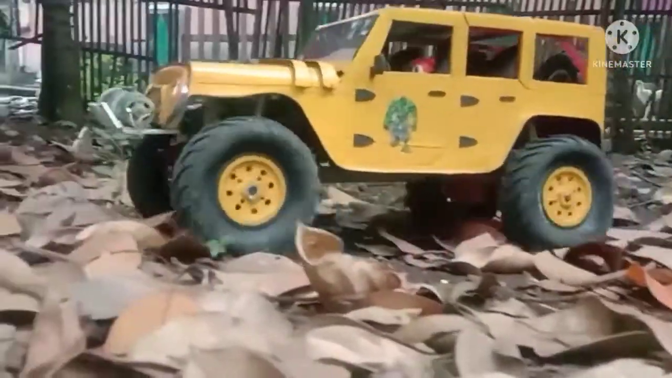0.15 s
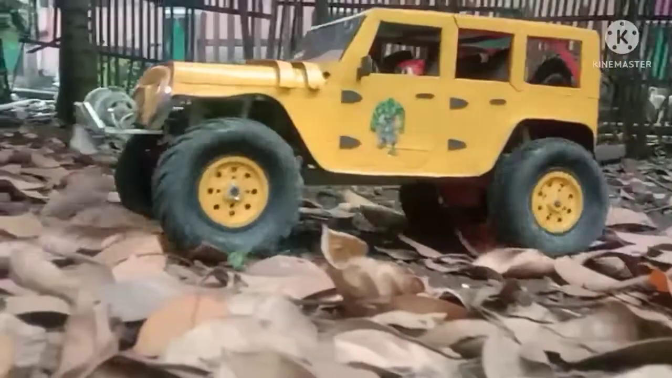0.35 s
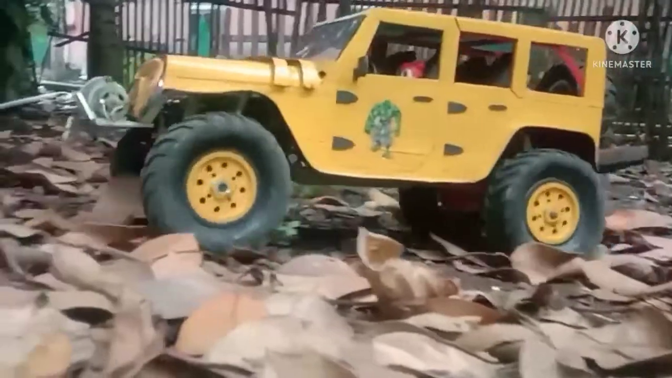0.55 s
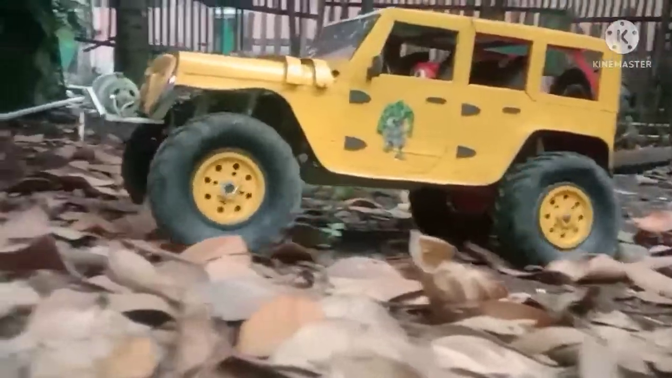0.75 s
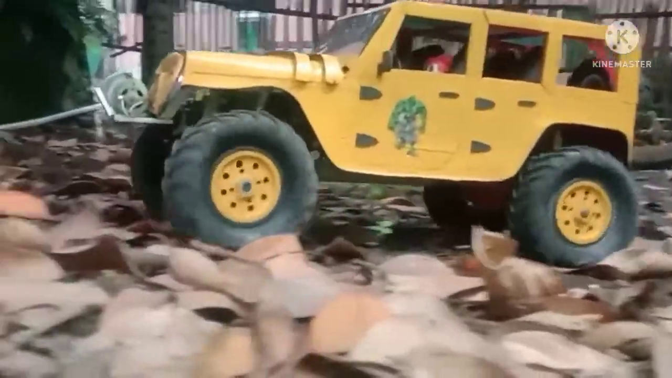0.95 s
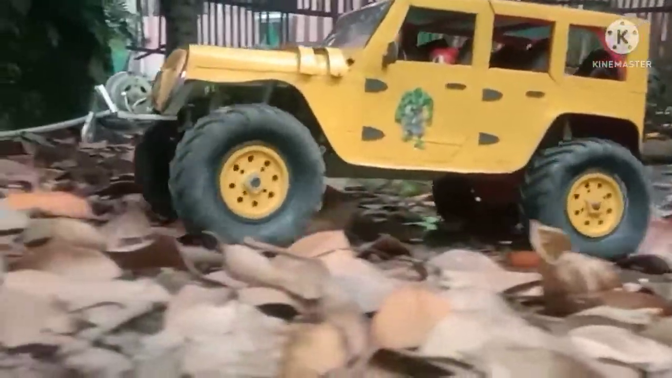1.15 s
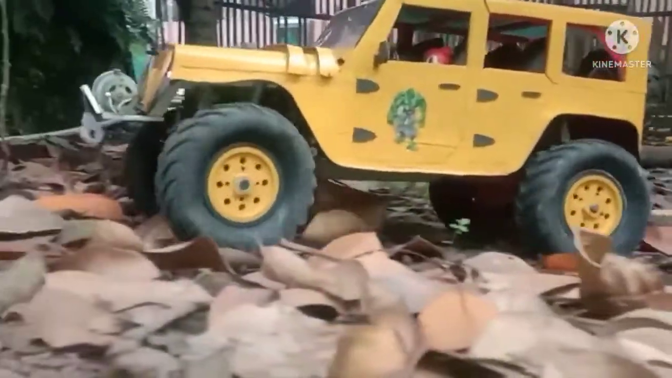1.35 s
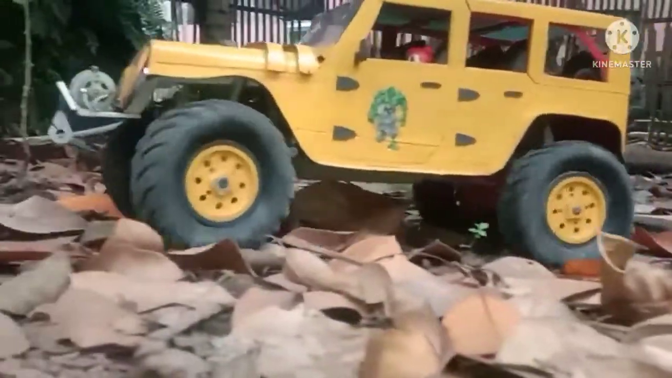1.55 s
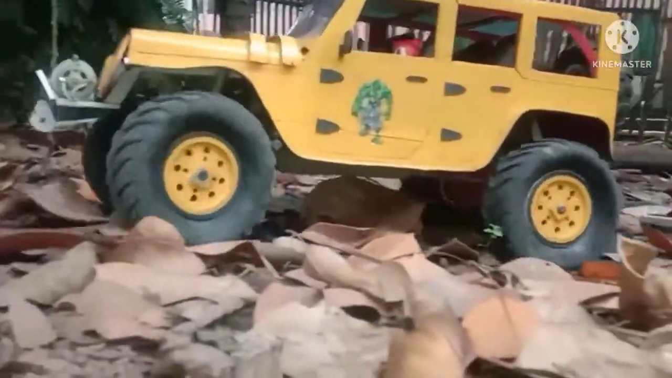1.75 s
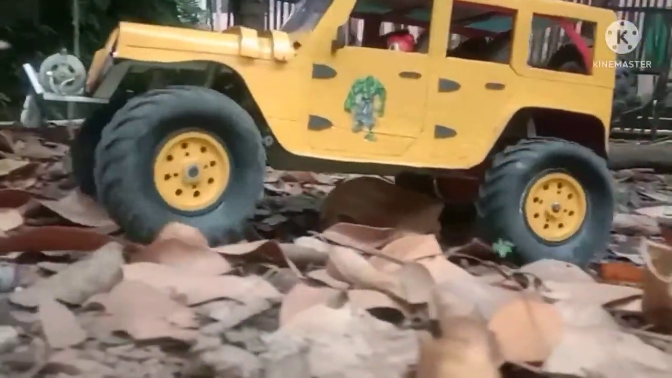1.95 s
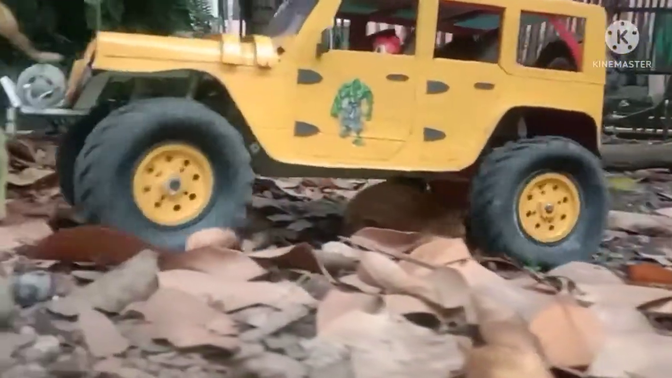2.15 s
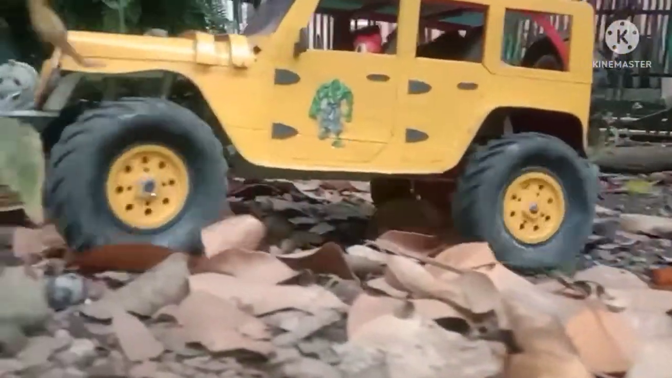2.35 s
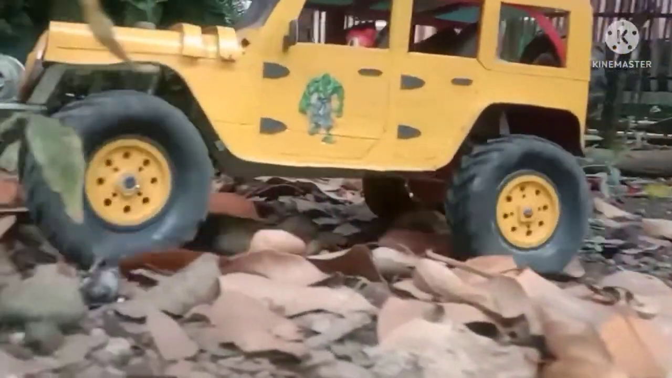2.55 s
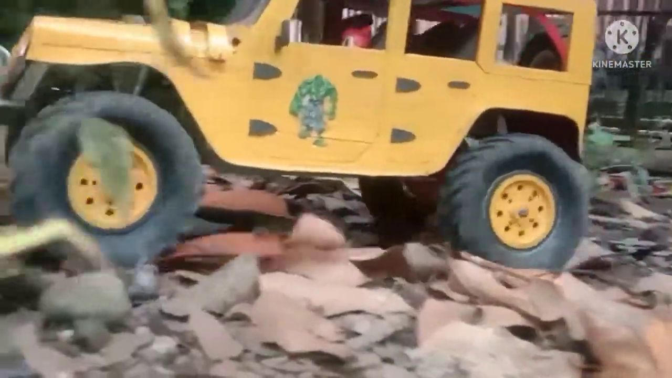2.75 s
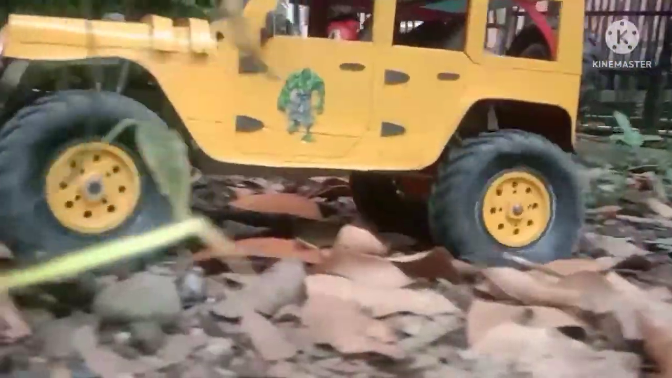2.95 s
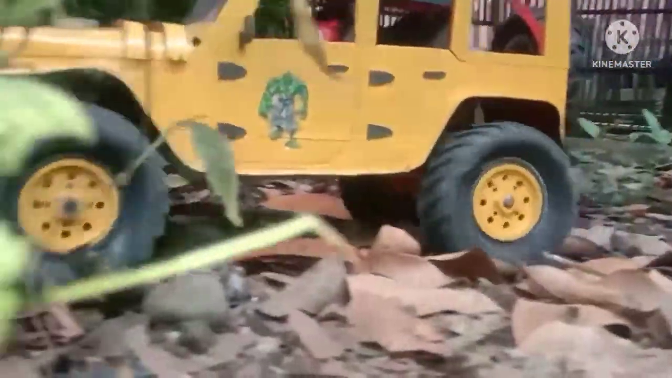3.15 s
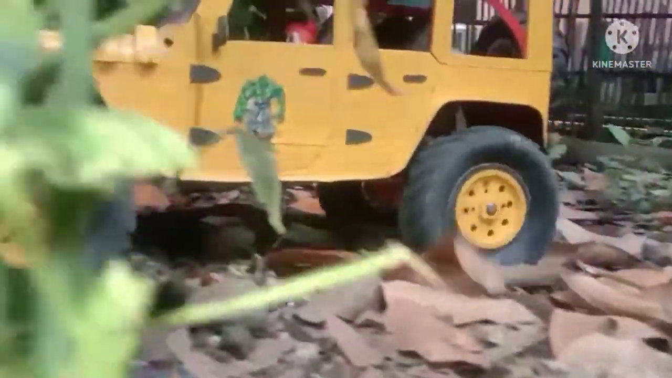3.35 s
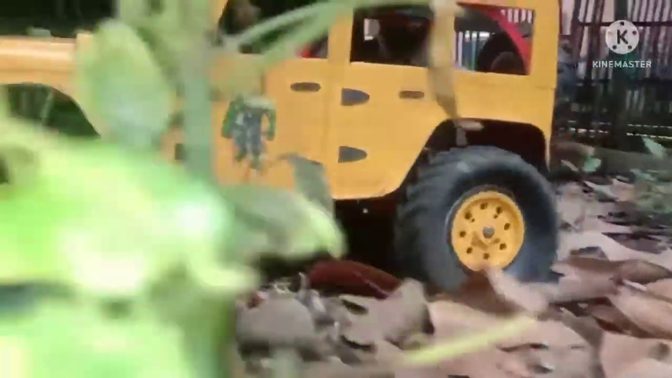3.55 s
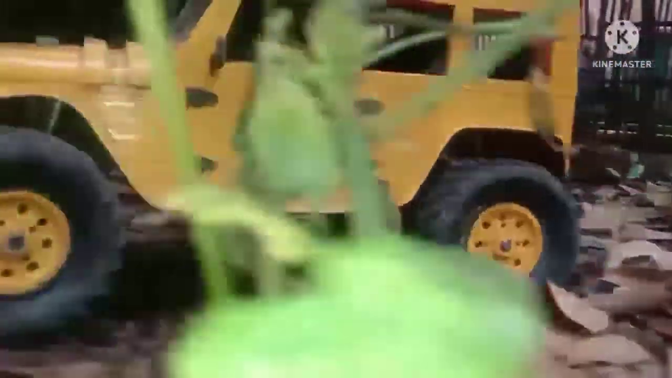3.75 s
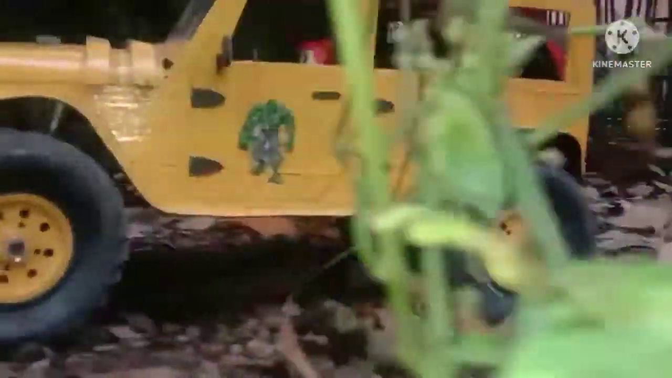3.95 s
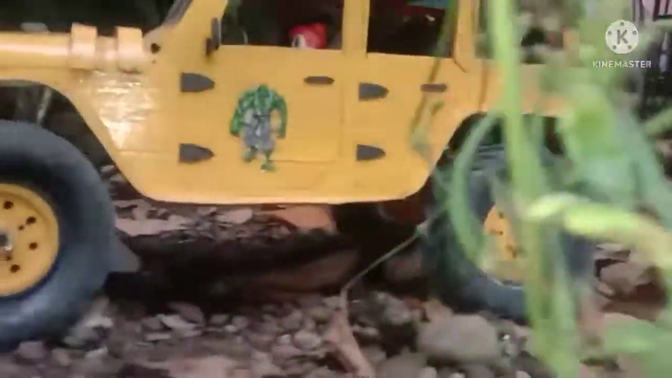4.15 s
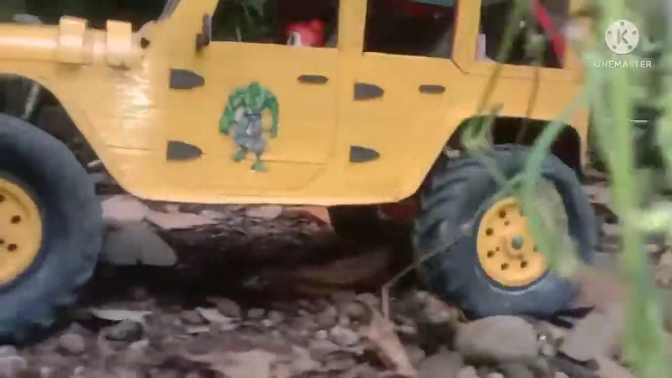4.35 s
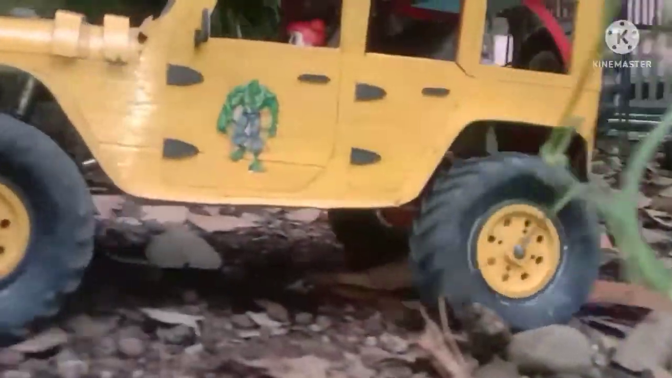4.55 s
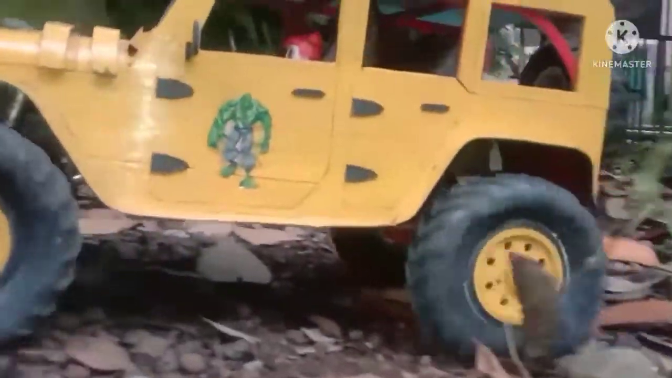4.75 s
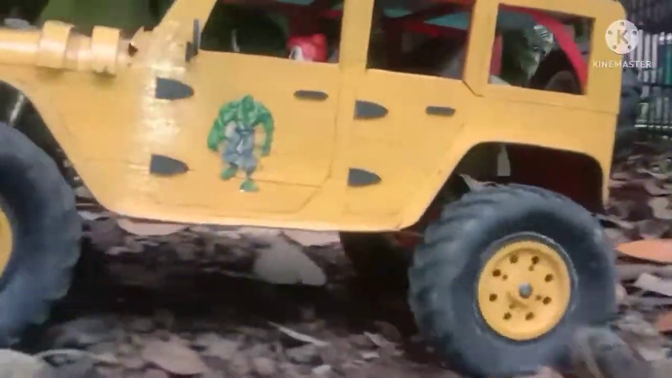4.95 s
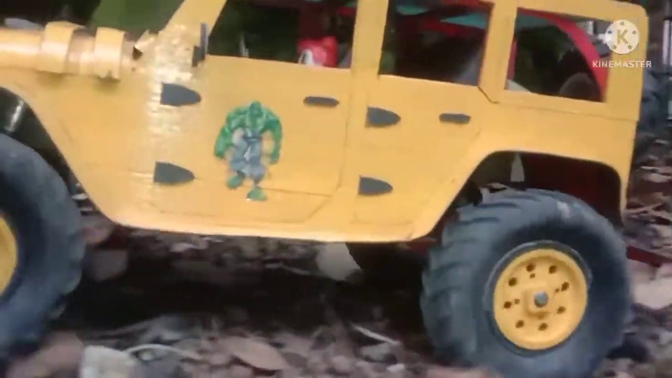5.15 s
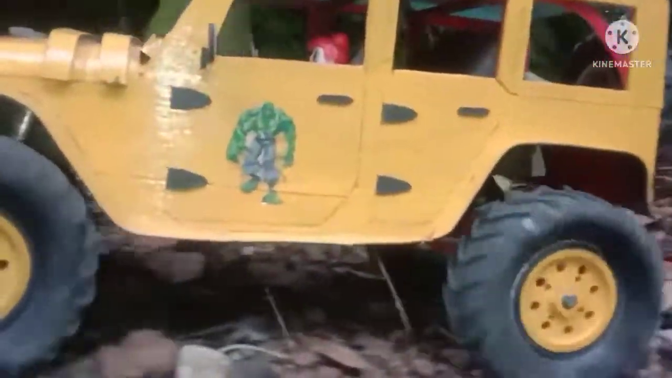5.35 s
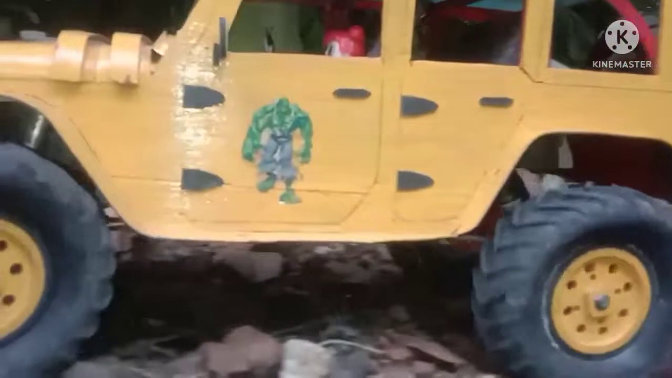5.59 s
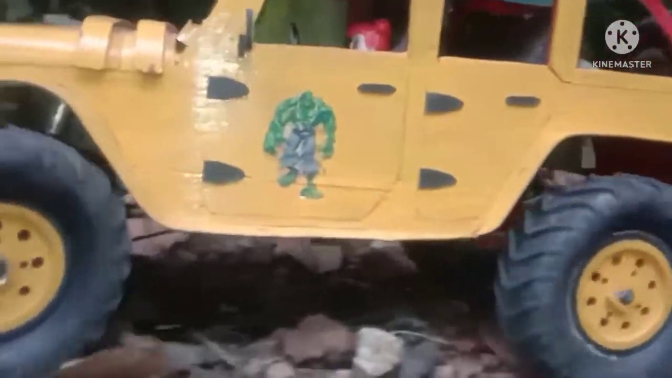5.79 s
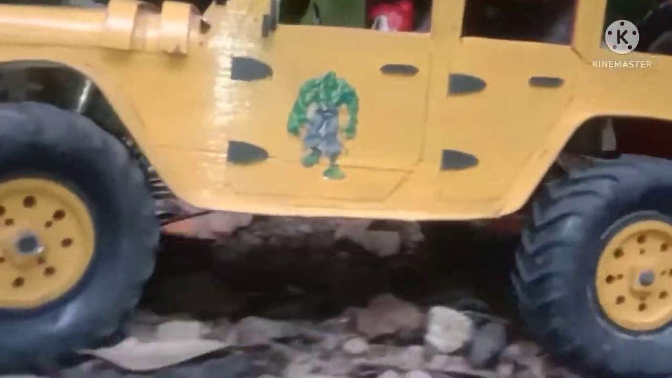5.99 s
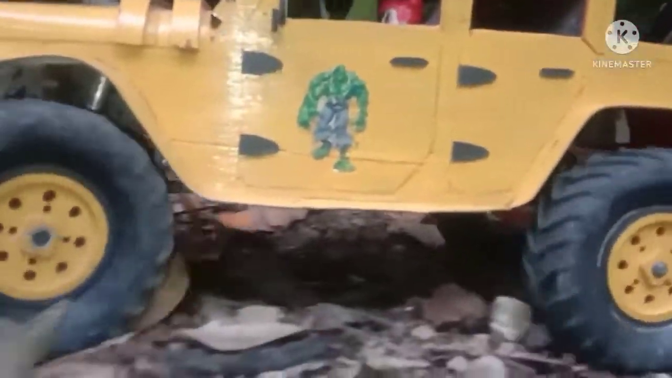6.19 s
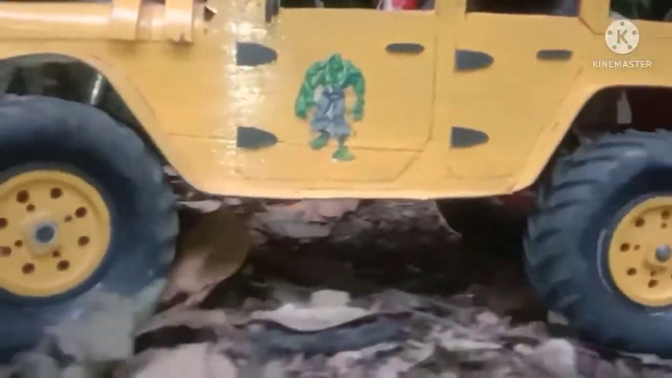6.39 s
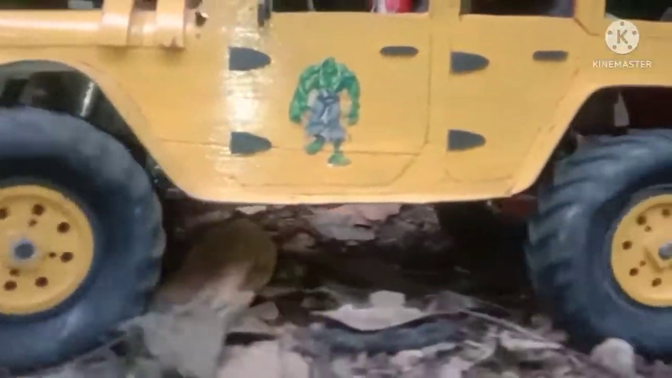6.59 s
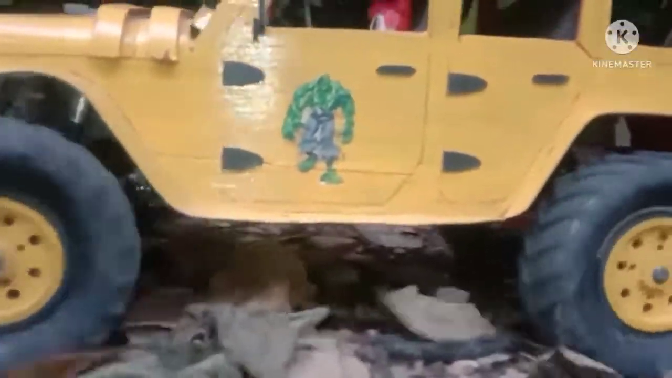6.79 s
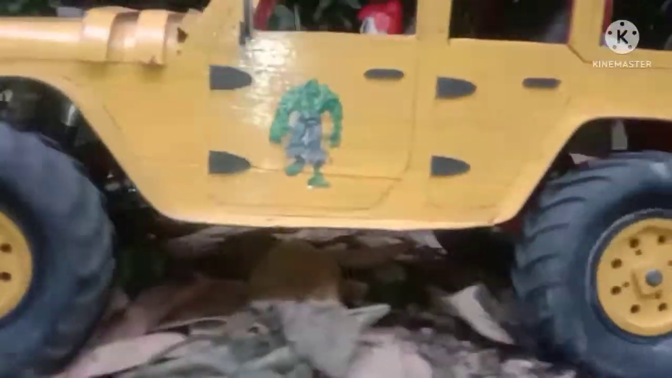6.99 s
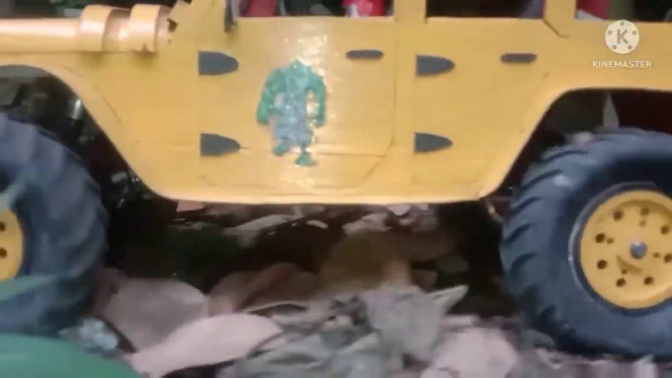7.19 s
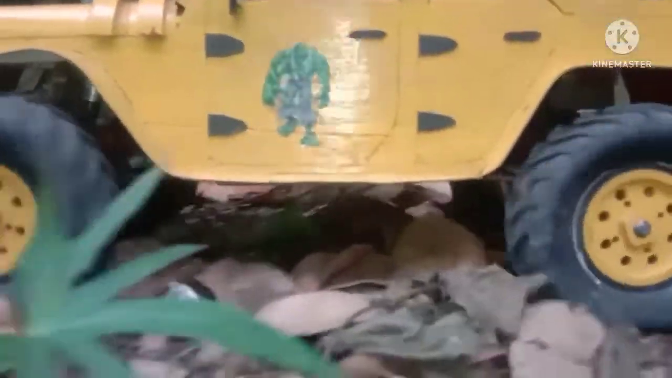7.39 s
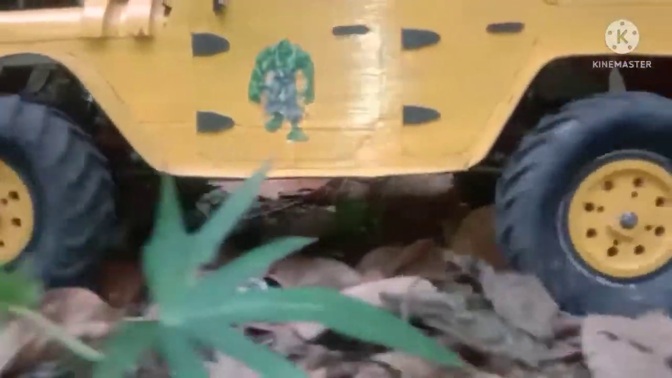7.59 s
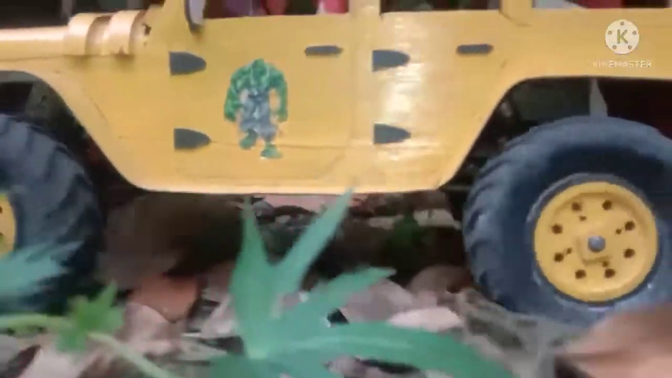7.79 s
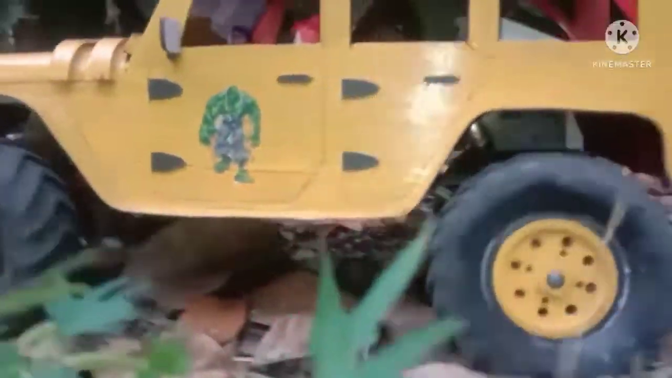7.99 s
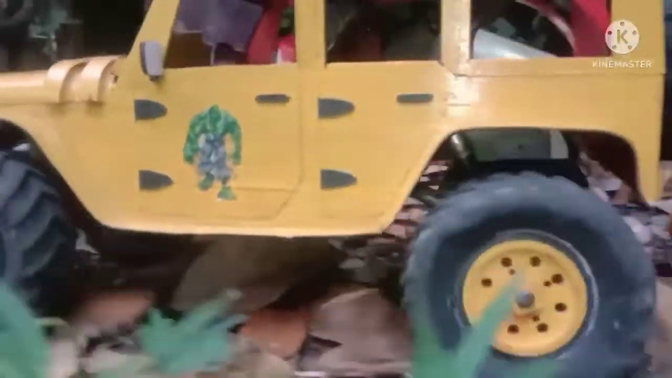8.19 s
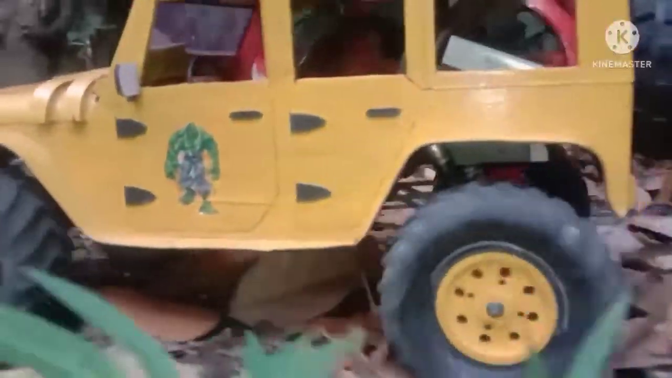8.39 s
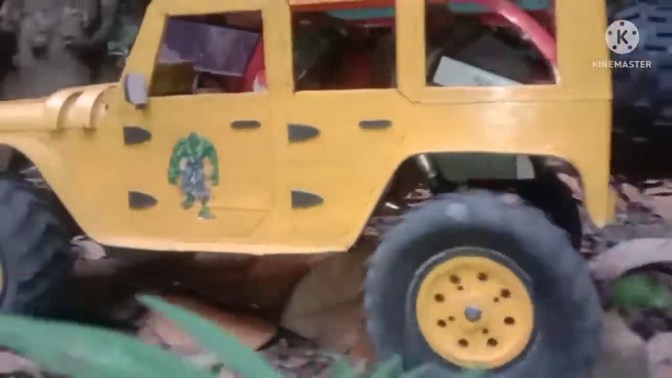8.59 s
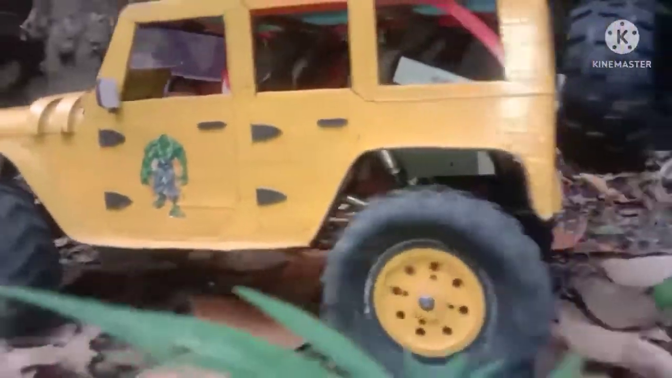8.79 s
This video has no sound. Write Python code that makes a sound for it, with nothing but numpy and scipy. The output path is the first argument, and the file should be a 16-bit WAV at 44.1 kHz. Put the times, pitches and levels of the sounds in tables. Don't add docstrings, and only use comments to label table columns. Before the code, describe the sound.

A toy crawler truck creeps past very close to the ground. A continuous bright gear chatter and wavering whine dominate, dipping briefly at each obstacle and recovering. Tyres press faintly through leaves, then grittier dirt after about two seconds. The truck swells closer by four seconds; a cluster of twigs snaps just before six. Far low rumble sits underneath, outdoors and dry.

```python
import sys
import numpy as np
from scipy import signal
from scipy.fft import rfft, irfft
from scipy.io import wavfile
from scipy.ndimage import uniform_filter1d

SR = 44100
rng = np.random.default_rng(int(sys.argv[2]) if len(sys.argv) > 2 else 0)


def attenuation_scalar(level_db):
    decades = np.asarray(level_db, float) / 20
    return 10 ** decades


def persist_wave(psi):
    counts = np.round(np.clip(psi, -1, 1) * 32767).astype(np.int16)
    wavfile.write(sys.argv[1], SR, np.atleast_2d(counts).T)


N = 389403
TIME = np.arange(N) / SR
TEETH = 30


def curves(table):
    s, *columns = np.transpose(table)
    return [np.interp(TIME, s, column) for column in columns]


def bumps(events):
    return sum(size * np.exp(-((TIME - s) / half) ** 2 / 2) for s, size, half in events)


def colour(hz, table):
    at, db = np.transpose(table)
    return np.interp(np.log(hz + 1), np.log(at), db)


def unit(x):
    return x / np.sqrt(np.mean(np.abs(x) ** 2))


def walk(rate):
    hold = int(SR / rate)
    steps = np.repeat(rng.standard_normal(9000), hold)[:N]
    return unit(uniform_filter1d(uniform_filter1d(steps, hold), hold))


def shaped(x, table):
    hz = np.fft.rfftfreq(N, 1 / SR)
    return unit(irfft(rfft(x) * attenuation_scalar(colour(hz, table)), N))


def body(x, broad, rings, parts_db, edges_hz, loud_hz, patchy_db):
    f, t, z = signal.stft(unit(x), SR, nperseg=2048, noverlap=1792)
    peaks = sum(attenuation_scalar(2 * db) / (1 + (2 * (f - centre) / width) ** 2) for centre, width, db in rings)
    power = attenuation_scalar(2 * colour(f, broad)) * (1 + peaks)
    above = [1 / (1 + np.exp(np.clip((edge - f) / 50, -50, 50))) for edge in edges_hz]
    share = -np.diff([1 + 0 * f, *above, 0 * f], axis=0)
    frames = np.clip((t * SR).astype(int), 0, N - 1)
    patches = rng.standard_normal(z.shape)
    for _ in range(2):
        patches = uniform_filter1d(uniform_filter1d(patches, size=4, axis=0), size=30, axis=1)
    gain_db = share.T @ np.array(parts_db)[:, frames] + patchy_db * unit(patches)
    band = np.mean(power * (f > loud_hz[0]) * (f < loud_hz[1]))
    z = z * np.sqrt(power / band)[:, None] * attenuation_scalar(gain_db)
    return signal.istft(z, SR, nperseg=2048, noverlap=1792)[1][:N]


def cracks(events, ring_s, spread):
    out = np.zeros(N)
    t = np.arange(int(.05 * SR)) / SR
    for s, db, hz in events:
        burst = rng.standard_normal(len(t)) * np.minimum(t / 0.00066, 1) * np.exp(-t / ring_s)
        edges = [hz / spread, min(hz * spread, .45 * SR)]
        burst = signal.sosfilt(signal.butter(2, edges, "bandpass", fs=SR, output="sos"), burst)
        start = int(s * SR)
        out[start:start + len(t)] += burst * attenuation_scalar(db) / np.max(abs(burst))
    return out


def knocks(hz, per_tooth):
    return (rng.random(N) < per_tooth * hz / SR) * rng.standard_normal(N)


# (time [s], nearness [dB])
NEARNESS = [(0, -8.5), (.54, -5.5), (1.05, -5.5), (1.52, -4), (1.95, -3.5), (2.2, 1.5), (2.6, -2), (3.0, 1),
            (3.4, 1), (3.82, 1.5), (4.1, 6.5), (4.6, 6), (5.6, 4.5), (6.11, 0.9), (6.58, 5), (7.02, 1.5),
            (7.8, 6.5), (8.83, 0)]
# (time [s], facing [dB])
LID_FACING = [(0, -1), (2.2, 1.5), (3.7, 2), (4.1, 5), (4.6, 6), (5.1, -.5), (5.7, 1.5), (6.5, -1.5),
              (7.05, -5.5), (7.6, -6), (7.95, 0), (8.3, -2), (8.83, -5)]


def part_levels(parts, turn_shares, hz):
    near_db, turn_db = curves(NEARNESS)[0], curves(LID_FACING)[0]
    over_cruise = (hz - 1600) / 100
    return [db + near * near_db + fast * over_cruise + turn * turn_db
            for (db, near, fast), turn in zip(parts, turn_shares)]


# (time [s], level [dB], half length [s])
HEAPS = [(.05, 1, 0.11), (.52, 8.5, 0.041), (2.02, 6.5, 0.064), (2.24, 7, .05), (3.9, -2, 0.48),
         (5.16, 3.5, 0.033), (5.45, 2, 0.34), (7.33, 1, .05)]
# (frequency [Hz], level [dB per Hz])
RUMBLE_COLOUR = [(15, -60), (30, -30), (45, -30), (60, -7), (80, -1.5), (101, 5.5), (125, -2.5), (160, 0.5),
                 (245, -10), (400, -18), (600, -43), (900, -90)]


def rumble():
    level_db = -63 + 0.2 * bumps(HEAPS) + 0.8 * walk(5.6)
    return shaped(rng.standard_normal(N), RUMBLE_COLOUR) * attenuation_scalar(level_db + 1.2 * walk(9))


# (frequency [Hz], level [dB per Hz])
DIRT_COLOUR = [(120, -30), (200, -8), (248, -5), (346, 3), (464, 2), (535, 3.5), (901, 1), (1100, -35),
               (1430, -26), (2420, -120)]


def tyre_crunch():
    leaves_db, grit_db, grit_rise_db_per_s = -64.5, -57.5, 0.08
    on_grit_s, change_s = 2.28, 0.053
    on_grit = (1 + np.tanh((TIME - on_grit_s) / change_s)) / 2
    grit_db = grit_db + grit_rise_db_per_s * (TIME - on_grit_s)
    crunch_db = leaves_db + on_grit * (grit_db - leaves_db) + bumps(HEAPS)
    grains = rng.standard_normal(N) * attenuation_scalar(2.5 * walk(150))
    return body(grains, DIRT_COLOUR, [(560, 94, 0.85)], [crunch_db], [], (250, 900), 1.8)


# (time [s], peak [dB], centre [Hz])
SNAPS = [(1.272, -28, 3900), (1.2725, -36, 1900), (2.283, -34, 3100), (5.766, -24, 4400),
         (5.767, -31, 1300), (5.784, -20, 4200), (5.788, -21, 4400), (5.785, -31, 1200), (5.80, -29, 2900),
         (6.02, -33, 2800)]
# (time [s], peak [dB], centre [Hz])
TICKS = [(0.3526, -49, 14900), (0.3676, -44, 14900), (0.5237, -43, 9000), (0.5384, -40, 14900),
         (2.1465, -37, 14760), (2.2054, -49, 15000), (4.3246, -35, 15000), (5.3887, -46, 14700),
         (5.7997, -39, 14900), (6.2946, -38, 15000), (6.6877, -50, 14800), (8.3045, -30, 14900),
         (8.739, -32, 9600)]
# (time [s], peak [dB], centre [Hz])
WHEEL_BUMPS = [(0.529, -52, 649), (0.853, -54, 105), (1.029, -55, 288), (2.215, -48, 113),
               (5.184, -44, 542), (5.788, -43.5, 360), (5.967, -45, 553), (6.749, -51, 409),
               (6.899, -43.5, 357)]


def snapping_leaves():
    snaps = cracks(SNAPS, .0028, 1.3)
    ticks = cracks(TICKS, 0.0016, 1.4)
    return snaps + ticks + cracks(WHEEL_BUMPS, 0.031, 1.2)


# end [s], start [s], last pitch [Hz], first pitch [Hz], level [dB]
CREAK = (3, 2.08, 465, 1257, -62)


def creak():
    start, end, from_hz, to_hz, db = CREAK
    part = np.clip((TIME - start) / (end - start), 0, 1)
    turns = np.cumsum(from_hz + (to_hz - from_hz) * part) / SR
    rub = unit(walk(300) + 1j * walk(300)) * np.exp(2j * np.pi * turns)
    return attenuation_scalar(db) * np.sin(np.pi * part) * rub.real


# (level at cruise [dB], share of nearness, speed effect [dB per 100 Hz of mesh rate])
BODY_PARTS = [
    (-54, 0.48, 0.65),
    (-55.5, 0.57, 0.5),
]
# (time [s], level [dB], half length [s])
TWISTS = [(2.05, 13.5, 0.027), (2.53, 7, .04), (2.8, -1, 0.085), (3.17, 3, 0.057), (4.75, 4.5, 0.062),
          (5.19, 0, .05), (7.01, 3.5, 0.074), (7.25, 1, .04), (7.42, -2, .06)]
# (frequency [Hz], level [dB per Hz])
SHELL_COLOUR = [(700, -29), (1000, -13), (1500, -13), (1900, -11), (2400, -9.5), (2700, -6.5),
                (3500, -29.5)]
# (frequency [Hz], width [Hz], level over the broad colour [dB])
SHELL_RINGS = [(1258, 50, 15), (2260, 120, 8)]


def axles(hz, load):
    shell_db, pan_db = part_levels(BODY_PARTS, (-.5, -.7), hz)
    shell_db = shell_db + bumps(TWISTS) + 0.76 * walk(13)
    walls_db = (shell_db + np.mean(shell_db)) / 2
    parts_db = [walls_db, shell_db, walls_db, pan_db]
    taps = knocks(hz, 9.0) * load ** 0.24
    return body(taps, SHELL_COLOUR, SHELL_RINGS, parts_db, [1140, 1380, 2000], (1150, 1330), 1.5)


# (time [s], mesh rate with the wheels running free [Hz])
THROTTLE = [(-0.0, 1366.0), (0.57, 1498.0), (1.05, 1515.0), (1.72, 1578.0), (2.24, 1659.0), (2.84, 1663.0),
            (3.34, 1851.0), (4.05, 1667.0), (4.77, 1825.0), (5.05, 1682.0), (5.45, 1747.0), (6.17, 1489.0),
            (6.47, 1650.0), (7.02, 1835.0), (7.68, 1857.0), (8.24, 1791.0), (8.45, 1872.0), (8.83, 1855.0)]
# (time [s], mesh rate lost [Hz], half length [s])
OBSTACLES = [(0.32, 96.0, 0.098), (0.75, 141.0, 0.06), (0.91, 193.0, 0.075), (1.26, 173.0, 0.074),
             (1.53, 186.0, 0.09), (1.89, 204.0, 0.093), (2.05, 274.0, 0.076), (2.39, 133.0, 0.109),
             (2.61, 108.0, 0.038), (2.72, 186.0, 0.092), (3.11, 157.0, 0.085), (3.66, 202.0, 0.092),
             (3.89, 274.0, 0.119), (4.3, 130.0, 0.072), (4.56, 243.0, 0.12), (4.89, 204.0, 0.073),
             (5.35, 155.0, 0.085), (5.68, 116.0, 0.112), (5.88, 202.0, 0.06), (6.0, 131.0, 0.043),
             (6.2, 116.0, 0.075), (6.66, 83.0, 0.16), (6.89, 112.0, 0.048), (7.15, 172.0, 0.072),
             (7.5, 199.0, 0.153), (7.84, 153.0, 0.076), (8.04, 61.0, 0.037), (8.34, 292.0, 0.082),
             (8.67, 118.0, 0.051)]


def mesh_rate():
    return uniform_filter1d(curves(THROTTLE)[0] - bumps(OBSTACLES), size=300)


TIGHT_SPOTS = [(.2, .08, .85), (.66, .065, .45)]


def tooth_load(turns):
    chance = np.tanh(rng.standard_normal((2000, len(TIGHT_SPOTS))))[turns.astype(int)].T
    load = .9
    for (at, width, strength), luck in zip(TIGHT_SPOTS, chance):
        load = load + strength * attenuation_scalar(2.2 * luck) * np.exp(-((turns % 1 - at) / width) ** 2 / 2)
    slow_gears = 0.029 * np.sin(2 * np.pi * 0.2 * turns) + 0.017 * np.sin(2 * np.pi * 0.58 * turns)
    return unit(load * (1 + slow_gears))


# (level at cruise [dB], share of nearness, speed effect [dB per 100 Hz of mesh rate])
GEARBOX_PARTS = [
    (-39, 0.57, 1.2),
    (-41.5, 1.27, 1.63),
    (-39, 0.88, 1.4),
    (-39.5, 0.55, 2.1),
]
PART_EDGES = [5840, 6290, 7850]
# (frequency [Hz], level [dB per Hz])
PLASTIC_COLOUR = [(1000, -60.5), (2200, -58), (2900, -6), (3600, -3.5), (4200, -6.5), (5500, -5),
                  (6200, -1), (7200, -9), (8000, -13.5), (9500, -18.5), (11300, -33), (13000, -43),
                  (14000, -35.5), (15500, -31.5)]
# (frequency [Hz], width [Hz], level over the broad colour [dB])
PLASTIC_RINGS = [(4480, 720, 4), (5280, 87, 10), (6075, 490, 9.5), (5840, 270, 5.5), (6560, 220, 4),
                 (7146, 390, 11.5), (15000, 860, 21.5)]


def chatter(hz, load):
    turn_shares = (-.33, .5, -.8, -.32)
    parts_db = [db + .7 * walk(14) for db in part_levels(GEARBOX_PARTS, turn_shares, hz)]
    throb = np.clip(.8 + curves(LID_FACING)[0] / 12, .5, 1.3)
    beat = load ** throb
    beat = beat / np.sqrt(uniform_filter1d(beat ** 2, SR // 8))
    taps = knocks(hz, 10) * beat * attenuation_scalar(1.53 * walk(30))
    return body(taps, PLASTIC_COLOUR, PLASTIC_RINGS, parts_db, PART_EDGES, (5500, 6400), 2.2)


# (time [s], level [dB])
BITE = [(0, 5), (.5, -6), (1.05, -0.5), (1.95, 2), (2.2, -5), (3.1, 2.5), (3.36, -7), (3.75, 3.5), (4.1, 1),
        (4.55, 0.5), (5.2, 2), (5.74, 1.5), (5.95, -7), (6.5, 1.5), (7.12, 10), (7.5, -14.5), (8.33, 9.5),
        (8.83, -12)]
# (time [s], level [dB], half length [s])
SINGING = [(1.1, 12, .08), (1.74, 11, .09), (2.92, 5, .08), (3.48, 12, .09), (4.15, 8, .1), (4.45, 9, .12),
           (4.75, 7, .08), (5.05, 9, .12), (5.4, 8, .1), (5.62, 7, .05), (6.55, 4, .15), (7.5, 2, .1)]
# (frequency [Hz], level [dB])
CASE = [
    [(1290, -51), (1400, -57), (1500, -53), (1600, -54), (1700, -60), (1860, -56)],
    [(2580, -52), (2800, -53), (3000, -48), (3200, -45), (3400, -48), (3720, -53)],
    [(3870, -66), (4200, -61), (4500, -57), (4800, -54), (5100, -54), (5580, -55)],
]
# (share of nearness, share of bite, share of singing, flutter [dB])
HARMONIC_MOVES = [
    (.4, -.3, .01, 1.8),
    (.4, 1, .05, .8),
    (.8, .1, 1, 1.2),
]


def harmonic_levels(hz):
    near_db, bite_db, sing_db = curves(NEARNESS)[0], curves(BITE)[0], bumps(SINGING)
    return [colour(k * hz, case) + near * near_db + bite * bite_db + sing * sing_db + flutter_db * walk(11)
            for k, (case, (near, bite, sing, flutter_db)) in enumerate(zip(CASE, HARMONIC_MOVES), 1)]


# (multiple of the gear turn, level re 1st mesh harmonic [dB])
SHAFT_TONES = [(10, -23), (11, -25), (12, -29), (15, -22), (22, -15), (23, -17), (28, -27), (45, -18)]


def whine(turns, load, levels_db, slack):
    out = 0
    levels_db = [*levels_db, levels_db[2] - 6]
    for k, (db, rough) in enumerate(zip(levels_db, (.4, .45, .8, 1.3)), 1):
        skirt = rough * slack * (walk(220) + 1j * walk(220)) * load
        line = attenuation_scalar(1.2 * walk(60) + 2 * walk(18)) / np.sqrt(1 + (rough * slack) ** 2 / 2)
        tone = np.exp(2j * np.pi * k * TEETH * turns)
        out = out + np.sqrt(2) * attenuation_scalar(db) * np.real((1 + skirt) * line * tone)
    shaft = sum(attenuation_scalar(db + 3 * walk(12)) * np.sin(2 * np.pi * m * turns) for m, db in SHAFT_TONES)
    return out + attenuation_scalar(uniform_filter1d(levels_db[0], SR)) * shaft


def scene():
    hz = mesh_rate()
    levels_db = harmonic_levels(hz)
    hz = hz * (1 + .003 * walk(40))
    turns = np.cumsum(hz) / SR / TEETH
    load = tooth_load(turns)
    slack = .7 + .4 * (hz / 1650) ** 6
    terrain = rumble() + tyre_crunch() + snapping_leaves()
    truck = creak() + axles(hz, load) + chatter(hz, load) + whine(turns, load, levels_db, slack)
    return (terrain + truck)[None]


def top_cut(x):
    return signal.sosfilt(signal.butter(12, 16810, fs=SR, output="sos"), x)


def record(dry):
    soft = .15 * np.tanh(dry / .15)
    cut = irfft(rfft(soft) * (np.fft.rfftfreq(N, 1 / SR) < 15500), N)
    return top_cut(cut)


dry = scene()
out = record(dry)
persist_wave(out)
```